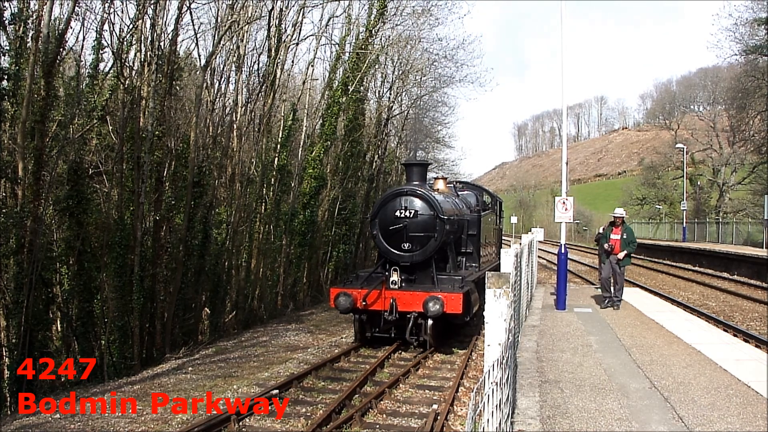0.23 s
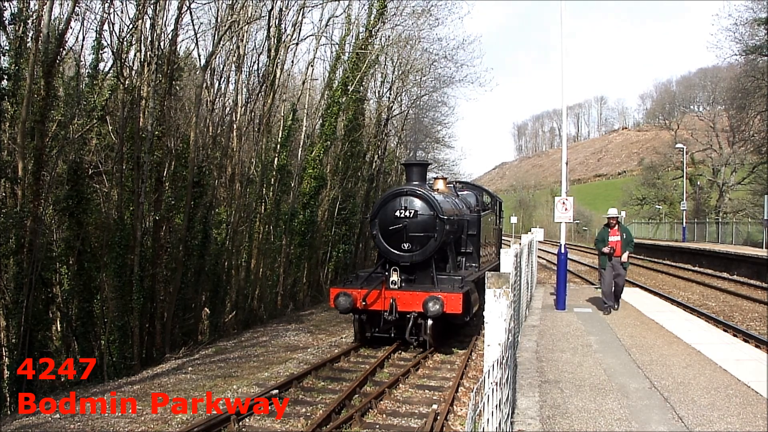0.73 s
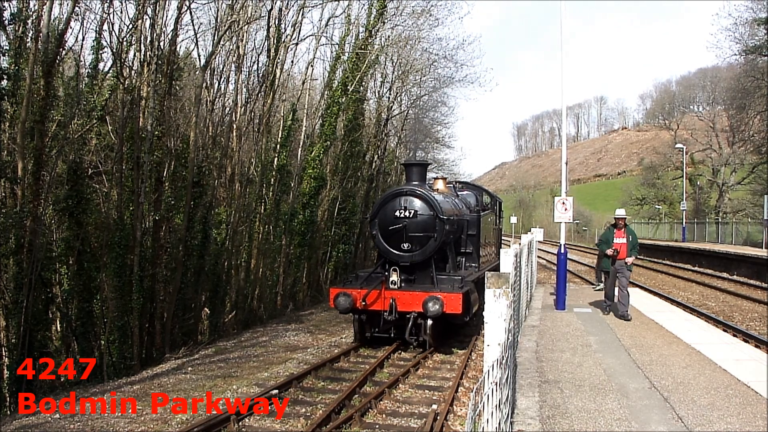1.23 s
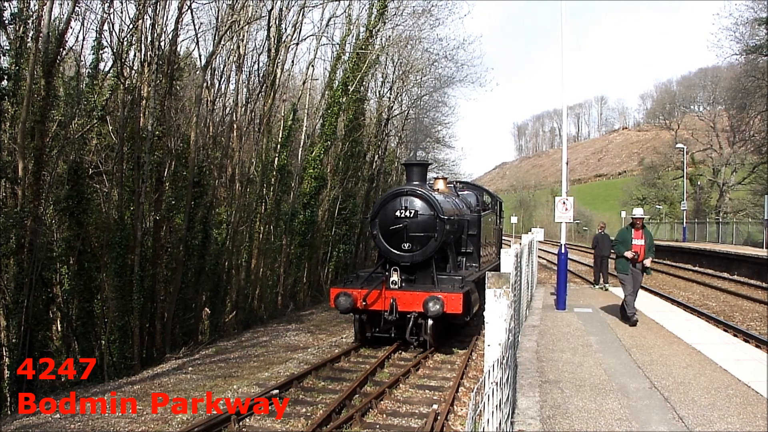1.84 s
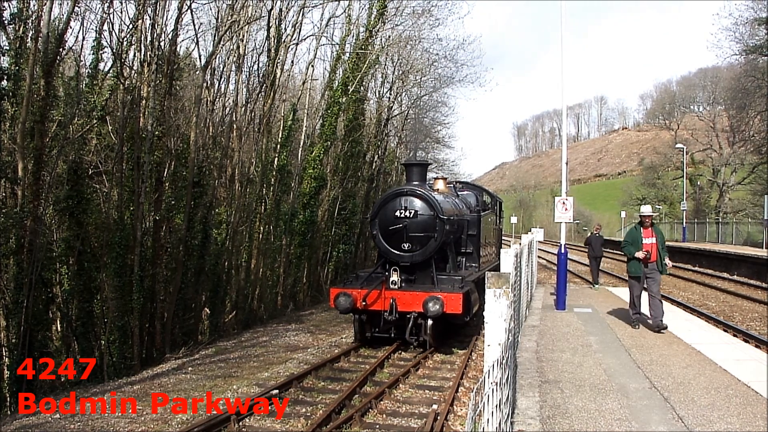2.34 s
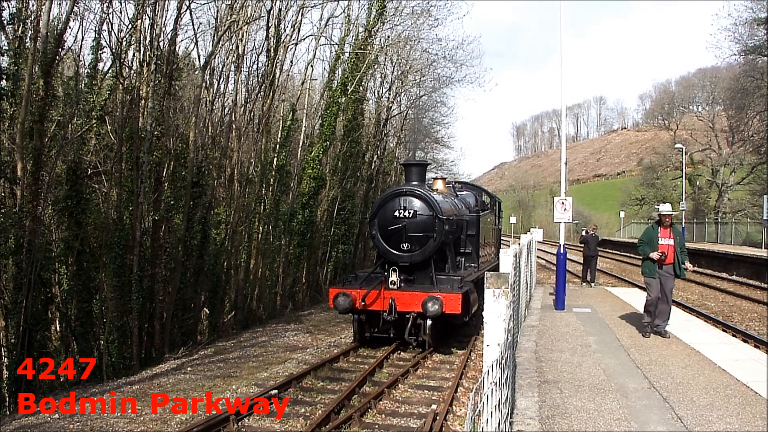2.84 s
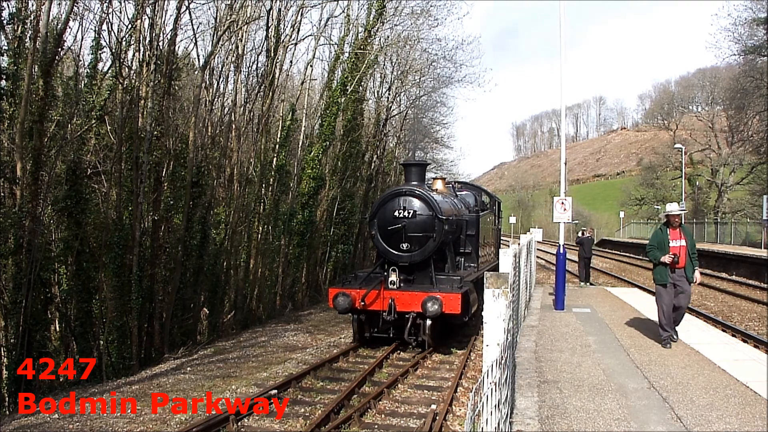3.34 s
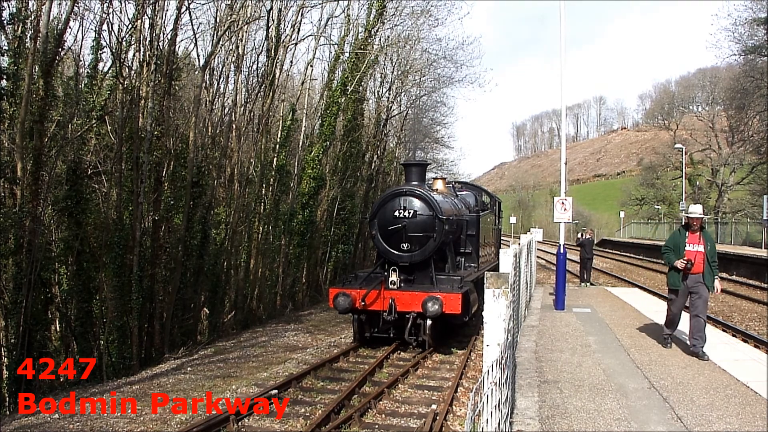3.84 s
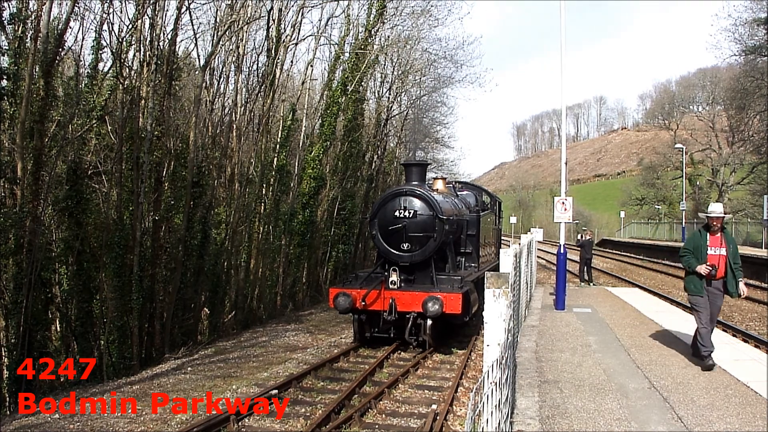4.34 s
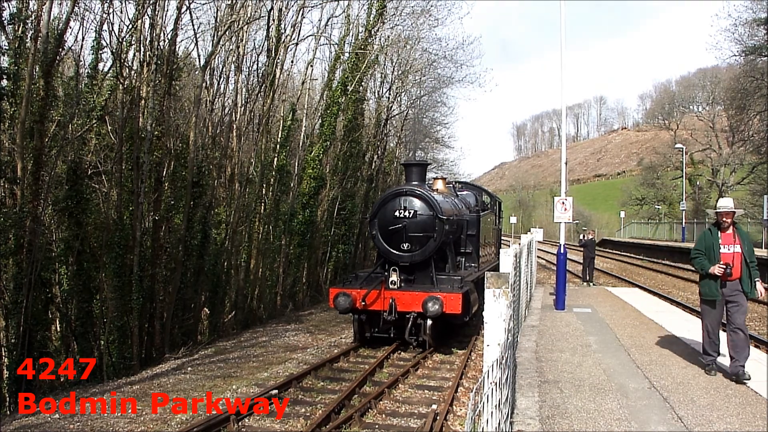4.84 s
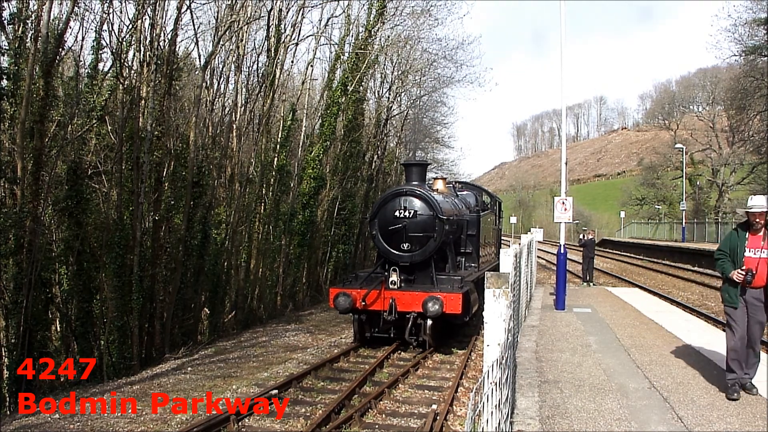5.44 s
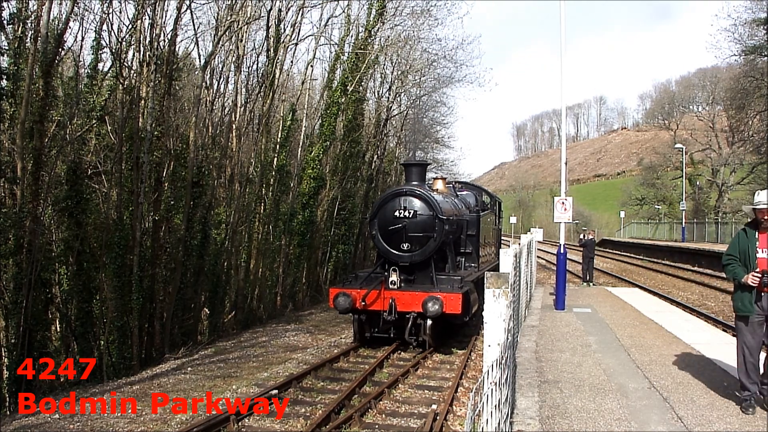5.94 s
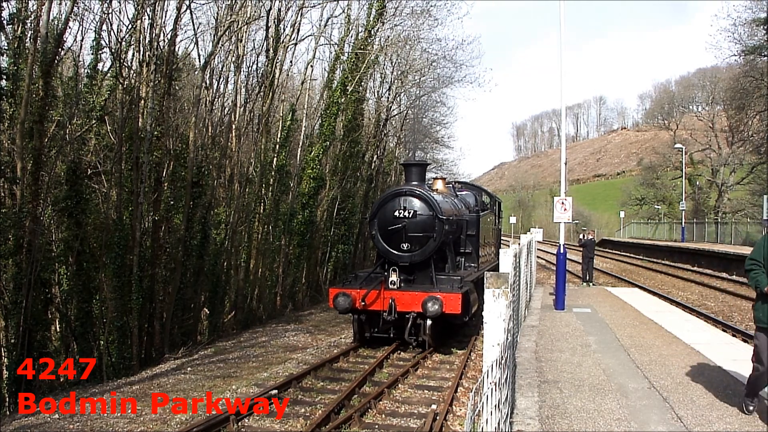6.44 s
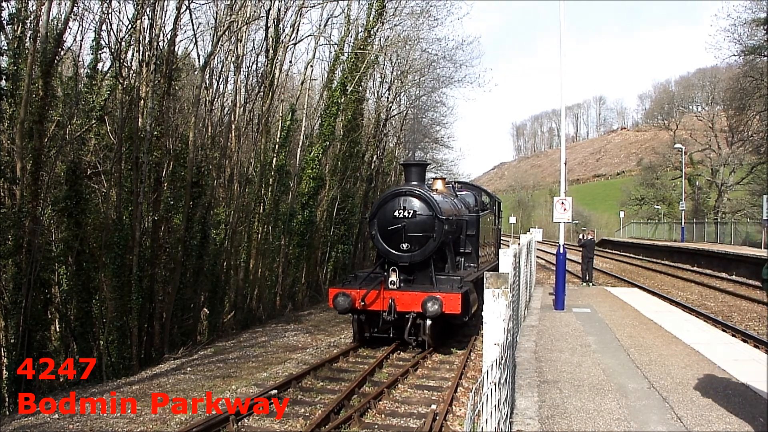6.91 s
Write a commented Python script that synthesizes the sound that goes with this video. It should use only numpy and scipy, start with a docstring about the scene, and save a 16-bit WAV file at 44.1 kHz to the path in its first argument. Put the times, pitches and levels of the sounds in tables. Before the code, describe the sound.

From the start, a steam locomotive's safety valves roar loudly and steadily near the centre, outdoors at a country platform, with a thin hiss above. Inside the roar hums the low, fast throb of a diesel engine with a slight clatter, slowly fading as it draws away. Six faint, high bird chirps repeat during the first second or so. At about 1.4 seconds, steam and engine dip slightly and recover within a second. From about 2.6 seconds the roar gradually eases and thins, brightening briefly around 3.3 seconds, while the hiss stays nearly constant. A few faint ticks sound close on the left, at about 1.9 seconds and between 3.5 and 3.9. The birds chirp faintly again from 2.8 to 3.8 seconds. Around 6.7 to 7.2 seconds, a clearer flurry of chirps comes from slightly right, over the much softer but continuing steam.

```python
"""A country platform: a steam locomotive's safety valves roar and slowly ease over a thin hiss.
Both are turbulent steam, noise in flickering octave bands. A low throb like an idling diesel drawing
away hums inside the roar: harmonics of one engine cycle, with valve-gear clatter. All three dip briefly.
Small birds chirp in the trees and a few faint ticks sound close by. The bass is nearly alike left and
right; an equaliser cuts narrow notches in the treble."""
import sys
import numpy as np
from scipy import signal
from scipy.fft import rfft, irfft, next_fast_len
from scipy.io import wavfile
from scipy.ndimage import uniform_filter1d

SR = 44100
rng = np.random.default_rng(int(sys.argv[2]) if len(sys.argv) > 2 else 0)


def materialize(psi):
    """Save the field psi as 16-bit PCM at rate SR to the path in sys.argv[1].

    A 1-D psi becomes a single channel; in a 2-D psi each row is a channel.
    """
    bounded = np.clip(np.atleast_2d(psi).T, -1, 1)
    quanta = np.round(bounded * 32767).astype(np.int16)
    wavfile.write(sys.argv[1], SR, quanta)


N = 316197

ROAR_DB, TILT_DB_PER_OCT, THINNING_PER_OCT = -15, -1.05, -0.0367
EASE_FROM_S, EASE_DB, EASE_TAU_S, SAG_DB_PER_S = 2.57, -8.5, 3.15, -0.2679
# Valve roar spectrum: (frequency [Hz], density [dB])
ROAR_SPECTRUM = [(25, -47), (50, -40), (78, -33), (92, -21), (110, -17.5), (150, -18), (190, -8.5),
                 (230, -2.5), (330, -3), (385, -3), (420, 0.5), (465, -1.5), (495, -3.5), (525, -2),
                 (565, -4), (620, -2.5), (660, -4), (770, -5), (830, -4.5), (950, -7), (1250, -6),
                 (1600, -11), (1930, -11), (2070, -16.5), (2320, -17.5), (2450, -28), (2750, -30),
                 (3600, -37)]


def valve_roar(t):
    """Safety valves blow, sag with the pressure, then ease; the weaker jet is thinner. Mid and side."""
    onset_db = -1.5 * np.exp(-t / .22)
    crest_db = .7 * np.exp(-((t - 1.16) / .25) ** 2)
    closing_db = EASE_DB * (1 - np.exp(-np.maximum(t - EASE_FROM_S, 0) / EASE_TAU_S))
    blast_db = onset_db + crest_db + SAG_DB_PER_S * t + closing_db
    brightening = .64 * np.exp(-((t - 3.3) / .36) ** 2)
    tilt = TILT_DB_PER_OCT + THINNING_PER_OCT * blast_db + brightening
    steam = jet(ROAR_SPECTRUM, tilt, swell_db=.27, flicker_db=.42, flicker_hz=10)
    return undb(ROAR_DB + blast_db + dip_db(t)) * steam


PIVOT_HZ = 495
# Stereo width of the steam: (frequency [Hz], side minus mid [dB])
STEAM_WIDTH = [(25, -6), (45, -13), (70, -22), (110, -16), (200, -25.5), (380, -22.5), (700, -17),
               (1290, -10.5), (2380, -9.5), (4400, -12.5), (5800, -7.5), (8120, -7.5), (9800, -6.5),
               (10700, -4), (14500, -4), (15700, -5)]


def jet(spectrum, tilt_db_per_oct, swell_db, flicker_db, flicker_hz):
    """Turbulent steam as mid and side: octave bands that swell together and flicker alone."""
    size = next_fast_len(N)
    hz = np.arange(size // 2 + 1) * SR / size
    noise = rfft(rng.standard_normal((2, size))) * spectrum_gain(spectrum, hz, outside_db=-120)
    noise[1] *= spectrum_gain(STEAM_WIDTH, hz + 1)
    mid_rms = np.sqrt(np.mean(irfft(noise[0], size) ** 2))
    octave = np.log2(np.maximum(hz, 1) / PIVOT_HZ)
    lowest, highest = (int(np.log2(spectrum[i][0] / PIVOT_HZ)) for i in (0, -1))
    out, common_db = 0, swell_db * walk(2.74)
    for centre in range(lowest - 1, highest + 2):
        band = irfft(noise * np.clip(1 - abs(octave - centre), 0, 1), size)[:, :N]
        out += band * undb(tilt_db_per_oct * centre + common_db + flicker_db * walk(flicker_hz))
    return out / mid_rms


HUM_DB, HUM_FADE_DB_PER_S = -22.5, -1.54
CYCLE_HZ, CYCLE_EXTRA_HZ, CYCLE_SETTLE_S = 11.275, .1, 2.6
EXHAUST_ORDER, RESONANCE_WIDTH_OCT = 19, .079
# Exhaust resonance swell: (time [s], level [dB])
EXHAUST_SWELL = [(0, 1), (1.3, 2.5), (1.6, -1.5), (2.4, -3.5), (2.9, -2), (3.15, 2), (3.45, 3), (3.8, 1),
                 (4.3, 2.5), (4.6, -3.5), (5.0, -0.5), (5.35, -3.5), (5.8, -0.5), (6.1, 1), (6.35, 5),
                 (6.7, 2.5), (7.17, -5)]
# Engine harmonics: (order [x cycle rate], level [dB], drift [dB/s])
ENGINE_HARMONICS = [(5, -38, .5), (6, -35, 1.2), (7, -39, 1.5), (8, -14.5, -.6), (9, -22.5, -.4),
                    (10, -16, .7), (11, -18.5, .2), (13, -15.5, -2), (14, -21, .1), (15, -20.5, 1.4),
                    (16, -15.5, -.1), (17, -10, 0), (18, -12, .6), (19, -1, 0), (20, -12, 0), (21, -19, .3),
                    (23, -13, .5), (24, -13, -.2), (26, -13.5, .2), (27, -13, -1.3), (28, -9.5, -1),
                    (29, -11.5, -.2), (30, -15.5, -.6), (31, -13, -2), (32, -15.5, 1), (33, -13, -1.1),
                    (34, -18, .6), (36, -13.5, -.4), (37, -15, -.1), (38, -12, .2), (39, -14.5, .2),
                    (40, -10, .3), (41, -14, .3), (42, -17, .1), (43, -23, 1.5), (45, -10, -.9),
                    (46, -5, -.5), (47, -12.5, -.7), (50, -23, 1.3), (51, -17, 0), (52, -14.5, -1.1),
                    (53, -11.5, -1.1), (54, -4.5, -2), (56, -6, -.9), (58, -11.5, -1), (59, -22, 1.5),
                    (60, -10, -.6), (61, -11.5, -1.2), (62, -17, -1.1), (64, -21, .1), (65, -13.5, -1.3),
                    (67, -17.5, -1.1)]


def engine_hum(t):
    """Harmonics of a receding engine; those near the exhaust resonance ring in step, one throb a cycle."""
    cycle_hz = CYCLE_HZ + CYCLE_EXTRA_HZ * np.exp(-t / CYCLE_SETTLE_S)
    cycles = .1199 + np.cumsum(cycle_hz) / SR
    swell_db = np.interp(t, *np.transpose(EXHAUST_SWELL))
    tones = 0
    for order, db, drift_db_per_s in ENGINE_HARMONICS:
        resonance = np.exp(-(np.log2(order / EXHAUST_ORDER) / RESONANCE_WIDTH_OCT) ** 2)
        orders_off = abs(order - EXHAUST_ORDER)
        offset_rad = min(.5 * orders_off, np.pi) * rng.uniform(-1.02, 1)
        # the air path wavers, more for short waves; the throb loosens as the engine draws away
        waver_rad = (.012 * order + .06 * t * min(orders_off, 2)) * walk(5)
        tone_db = db + swell_db * resonance + drift_db_per_s * t + 1.2 * walk(5)
        tones += undb(tone_db) * np.cos(2 * np.pi * order * cycles + offset_rad + waver_rad)
    gain = np.sqrt(2) * undb(HUM_DB + HUM_FADE_DB_PER_S * t + dip_db(t))
    return gain * (tones + clatter(cycles))


CLATTER_ORDERS, CLATTER_RE_HUM_DB, CLATTER_DB_PER_OCT = range(68, 128), -25, -4.5


def clatter(cycles):
    """Valve gear: the same rattle once a cycle, a little early or late."""
    turn, rattle = np.arange(4096) / 4096, 0
    for order in CLATTER_ORDERS:
        db = CLATTER_RE_HUM_DB + CLATTER_DB_PER_OCT * np.log2(order / CLATTER_ORDERS[0])
        rattle += undb(db) * np.cos(2 * np.pi * (order * turn + rng.uniform()))
    return np.interp((cycles + .0015 * walk(5)) % 1, turn, rattle, period=1)


HISS_DB, HISS_DIP_SHARE = -36, .74
# Thin hiss spectrum, with a filtered-out gap in the high treble: (frequency [Hz], density [dB])
HISS_SPECTRUM = [(1500, -8.5), (2300, 3.5), (2700, -1), (3300, -11.5), (4500, -8), (5400, -3), (6000, -0.5),
                 (7000, -1.5), (8500, -0.5), (9500, -6), (10500, -12.5), (11300, -24), (14000, -83),
                 (14700, -21), (15700, -20)]


def steam_hiss(t):
    """A thin, nearly steady hiss, as mid and side."""
    steam = jet(HISS_SPECTRUM, tilt_db_per_oct=0, swell_db=.098, flicker_db=.19, flicker_hz=9.9)
    return undb(HISS_DB + HISS_DIP_SHARE * dip_db(t)) * steam


START_FLAT_SHARE, WAVER_SHARE, LOWER_NOTE_RATIO, RIGHT_LAG_S = .006, .011, .922, 5e-5
# Bird notes: (time [s], length [s], pitch [Hz], level [dB], lower note re main [dB], L minus R [dB])
BIRD_NOTES = [(.22, .06, 6550, -45, -30, 1), (.4, .07, 6550, -44.5, -30, 1), (.57, .07, 6550, -44, -30, 1),
              (.75, .07, 6540, -43, -30, 1), (.92, .08, 6540, -44, -30, 1), (1.1, .07, 6530, -43.5, -30, 1),
              (2.79, .12, 6380, -43, -30, 0), (3.05, .09, 6040, -43, -30, 0), (3.3, .1, 6050, -41, -30, 1),
              (3.4, .14, 6040, -41.5, -30, 1), (3.7, .12, 6000, -45, -30, 0),
              (6.74, .16, 6050, -36.5, -12, -3), (6.92, .06, 6060, -33.5, -7, -3),
              (6.95, .1, 5540, -40, -30, -3), (7.04, .13, 6050, -41, -30, -2),
              (7.065, .13, 5790, -37.5, -10, -2), (7.035, .045, 2590, -34.5, -30, -4),
              (7.07, .035, 2265, -34, -30, -2)]


def birds():
    """Short wavering whistles from one side, some doubled by a lower note."""
    out, waver, tremble = np.zeros((2, N)), walk(220), walk(130)
    for start_s, length_s, hz, db, lower_db, pan_db in BIRD_NOTES:
        start = int(start_s * SR)
        n = min(int(length_s * SR), N - start)
        span, progress = slice(start, start + n), np.arange(n) / n
        pitch_hz = hz * (1 - START_FLAT_SHARE * np.exp(-5 * progress) + WAVER_SHARE * waver[span])
        phase = 2 * np.pi * (np.cumsum(pitch_hz) / SR - np.array([[0], [hz * RIGHT_LAG_S]]))
        note = np.sin(phase) + undb(lower_db) * np.sin(LOWER_NOTE_RATIO * phase)
        envelope = np.minimum(progress / .1, 1) * (1 - progress) ** .35 * undb(3.5 * tremble[span])
        out[:, span] += undb(db + np.array([[pan_db], [-pan_db]]) / 2) * envelope * note
    return out


def tree_echo(sound, t60_s=.3, echo_db=-3):
    """Direct sound plus a short smear of echoes from the trunks."""
    t = np.arange(int(t60_s * SR)) / SR
    response = rng.standard_normal((2, len(t))) * undb(-60 * t / t60_s)
    response *= undb(echo_db) / np.sqrt(np.sum(response ** 2, axis=1, keepdims=True))
    response[:, 0] += 1
    return signal.fftconvolve(sound, response, axes=1)[:, :N]


# Tick resonances: (frequency [Hz], level [dB])
RING_MODES = [(7000, 0), (8300, -4), (9500, -3)]
# Tick onsets: (time [s], level [dB])
TICK_HITS = [(1.85, -33), (3.525, -30), (3.538, -35), (3.592, -35), (3.871, -29)]


def ticks(decay_s=.0025):
    """Faint ticks close by on the left, each ringing the same short modes."""
    out, t = np.zeros(N), np.arange(SR // 20) / SR
    ring = sum(undb(db) * np.sin(2 * np.pi * hz * t) for hz, db in RING_MODES) * np.exp(-t / decay_s)
    for start_s, db in TICK_HITS:
        start = int(start_s * SR)
        out[start:start + len(t)] += undb(db) * ring
    return out * np.array([[1], [-.3]])


def dip_db(t, at_s=1.395, depth_db=-2, fall_s=.065, return_s=.55):
    """The level drops suddenly and creeps back."""
    since_s = np.maximum(t - at_s, 0)
    return depth_db * np.minimum(since_s / fall_s, 1) * np.exp(-(since_s / return_s) ** 2)


def walk(rate_hz):
    """Random steps smoothed twice; spread near 1."""
    hold = int(SR / rate_hz)
    steps = np.repeat(rng.standard_normal(N // hold + 1), hold)
    return 1.3 * uniform_filter1d(uniform_filter1d(steps, hold), hold)[:N]


def spectrum_gain(table, hz, outside_db=None):
    """Gain of a spectrum table, interpolated over log frequency."""
    knots_hz, db = np.transpose(table)
    return undb(np.interp(np.log(np.maximum(hz, 1)), np.log(knots_hz), db, outside_db, outside_db))


def undb(db):
    """dB to gain."""
    return 10 ** (np.asarray(db) / 20)


PRESENCE_L_MINUS_R_DB, LEFT_LEAD_S = -1.3, 8e-6


def scene():
    """Steam and engine near the centre; birds and ticks from the side."""
    t = np.arange(N) / SR
    mid, side = steam_hiss(t) + valve_roar(t)
    mid += engine_hum(t)
    presence = signal.lfilter(*signal.butter(1, [1500, 9000], "band", fs=SR), mid)
    side += presence * (undb(PRESENCE_L_MINUS_R_DB) - 1) / 2
    side += np.gradient(mid) * SR * LEFT_LEAD_S / 2  # the slope acts as a tiny time shift
    return np.array([mid + side, mid - side]) + tree_echo(birds()) + ticks()


STOP_FROM_HZ, STOP_TO_HZ, LOWPASS_HZ = 11550, 13850, 15750
# Equaliser notches: (centre [Hz], width [Hz])
EQ_NOTCHES = [(3015, 370), (4005, 300), (4995, 425)]


def record(dry):
    """Equaliser: narrow notches, a stop band in the high treble and a steep low-pass."""
    out = dry
    for hz, width_hz in EQ_NOTCHES:
        out = signal.filtfilt(*signal.iirnotch(hz, hz / width_hz, SR), out)
    bandstop = signal.ellip(7, .5, 60, [STOP_FROM_HZ, STOP_TO_HZ], "bandstop", fs=SR, output="sos")
    lowpass = signal.ellip(10, .2, 60, LOWPASS_HZ, fs=SR, output="sos")
    return signal.sosfilt(lowpass, signal.sosfilt(bandstop, out))


dry = scene()
out = record(dry)
materialize(out)
```